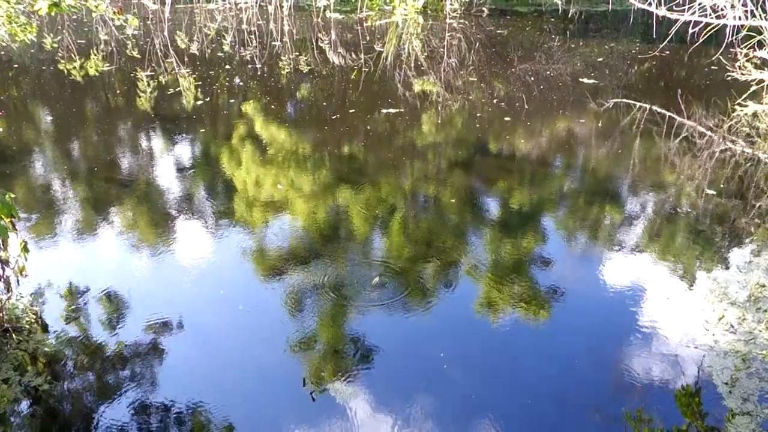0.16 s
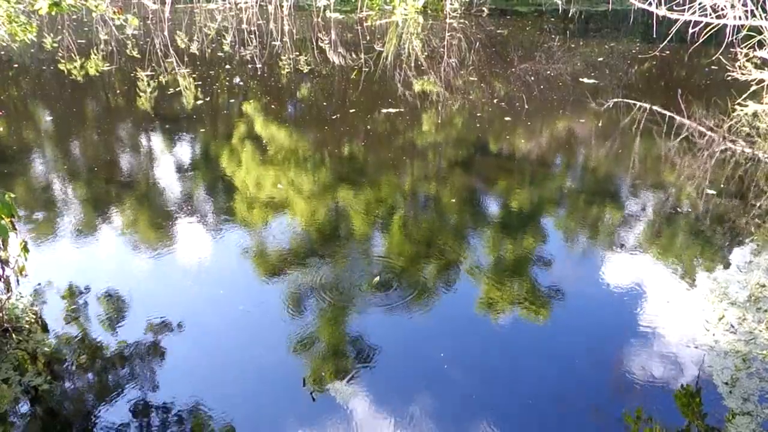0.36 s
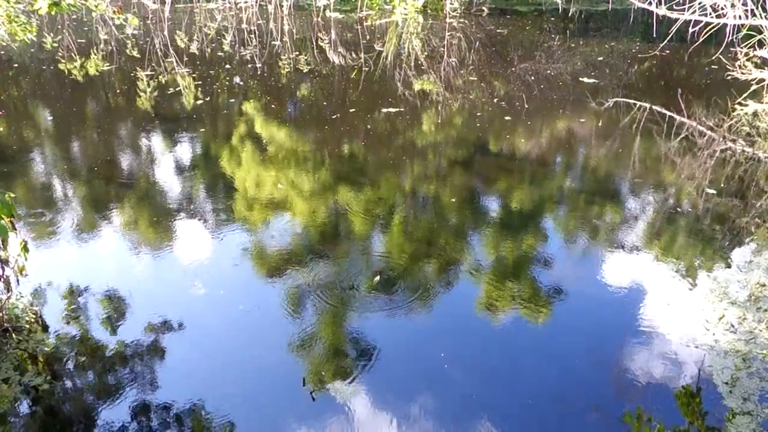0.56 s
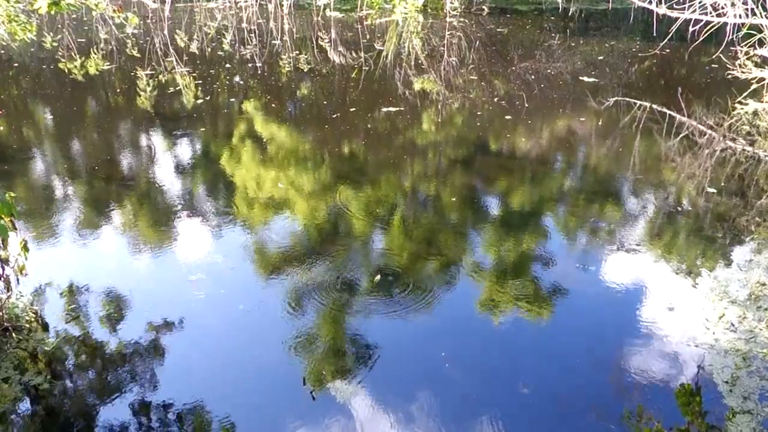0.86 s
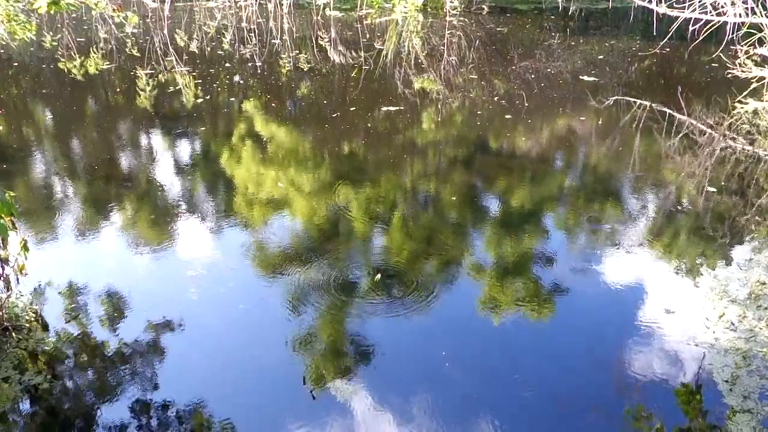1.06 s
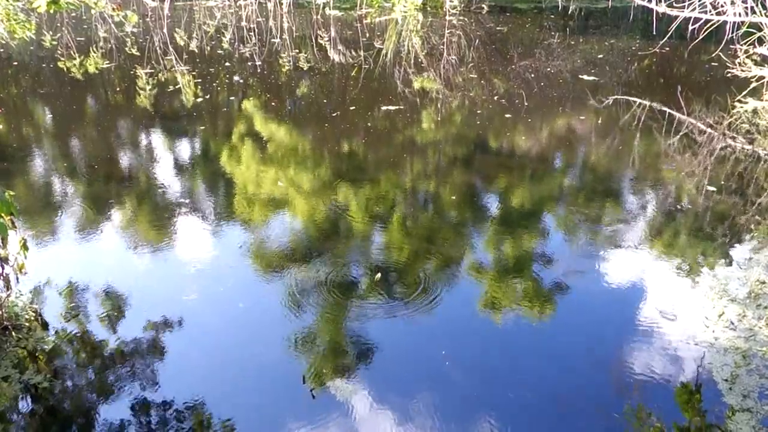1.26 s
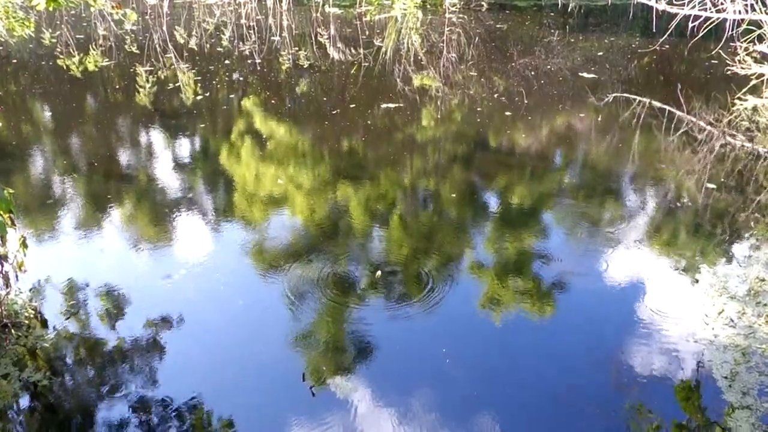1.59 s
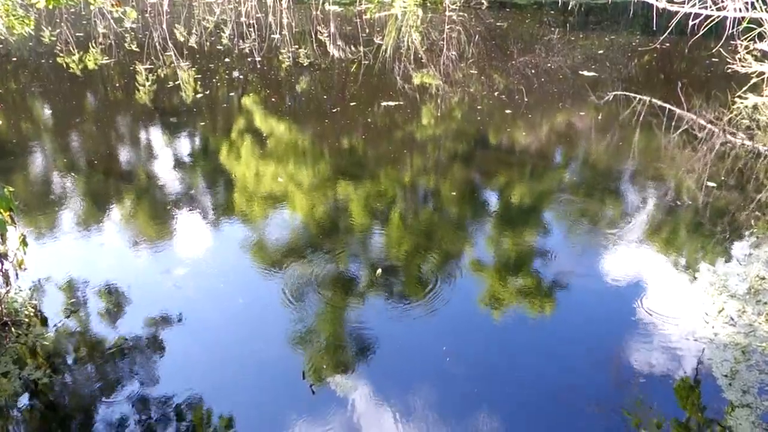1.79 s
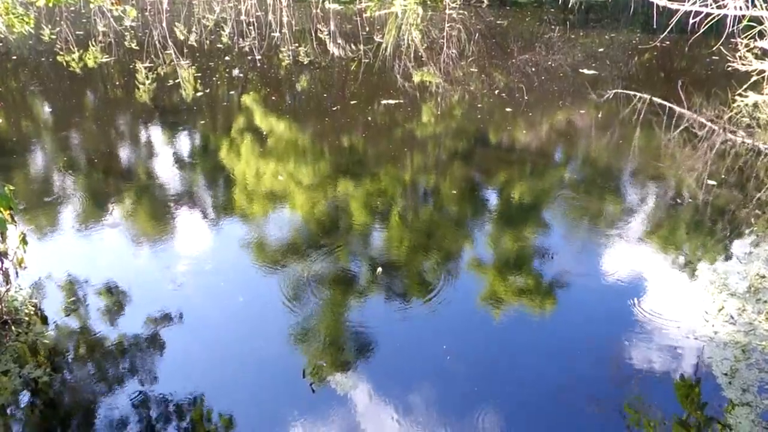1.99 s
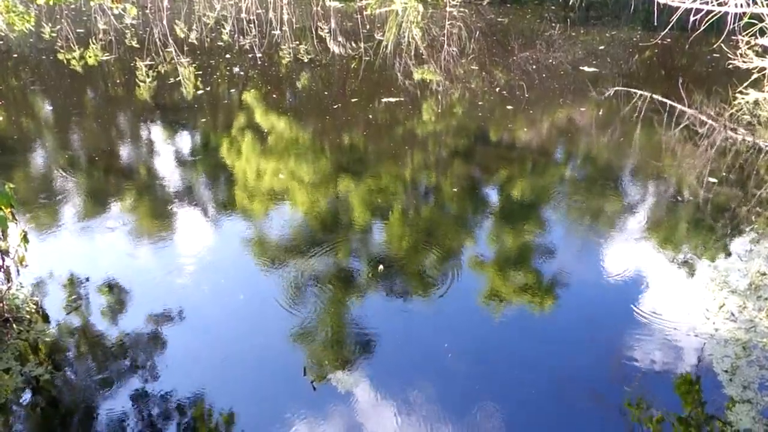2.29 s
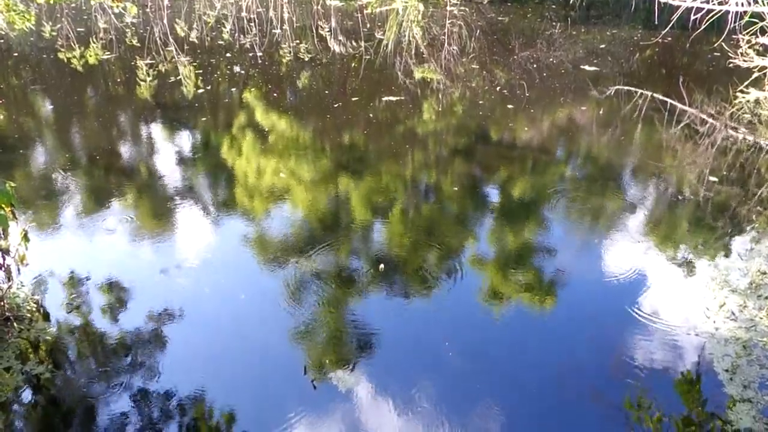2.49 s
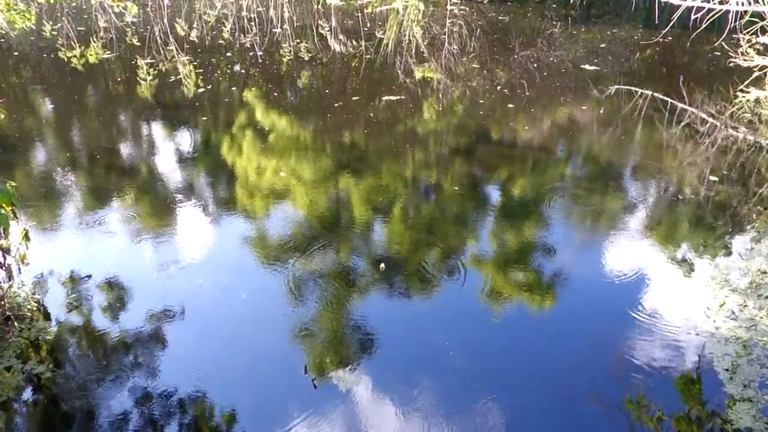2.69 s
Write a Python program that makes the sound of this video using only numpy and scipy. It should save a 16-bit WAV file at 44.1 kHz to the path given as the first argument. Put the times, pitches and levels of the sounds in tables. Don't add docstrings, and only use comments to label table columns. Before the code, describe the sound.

Low bullfrog croaks come in three overlapping groups, two close pitches beating together, with fainter frogs answering. Birds whistle and chirp on both sides over a swelling insect hiss; outdoor stereo with a short pond echo.

```python
import sys
import numpy as np
from scipy import signal
from scipy.fft import rfft, irfft
from scipy.io import wavfile
from scipy.ndimage import uniform_filter1d

SR = 44100
rng = np.random.default_rng(int(sys.argv[2]) if len(sys.argv) > 2 else 0)


def invert_db(level):
    return 10 ** (np.asarray(level, dtype=float) / 20)


def to_wav(s):
    ch = np.atleast_2d(s).T
    pcm = np.round(np.clip(ch, -1, 1) * 32767)
    wavfile.write(sys.argv[1], SR, pcm.astype(np.int16))


N = 125685
T = np.arange(N) / SR


def evened(x):
    return x / np.sqrt(np.mean(x ** 2) + 1e-20)


def read(points, hz):
    f, value = np.transpose(points)
    return np.interp(np.log(hz + 1), np.log(f + 1), value)


def drift(shape, size):
    once = uniform_filter1d(rng.standard_normal(shape), size)
    return evened(uniform_filter1d(once, size))


def add(mix, s, sound):
    i = round(s * SR)
    part = mix[max(i, 0):max(i + len(sound), 0)]
    part += sound[max(-i, 0):][:len(part)]


def follow(curve):
    s, hz, db = np.transpose(curve)
    t = np.arange(s[0], s[-1], 1 / SR)
    ends = np.clip(np.minimum(t - s[0], s[-1] - t) / 0.0018, 0, 1)
    pitch = uniform_filter1d(np.interp(t, s, hz), size=200)
    level = uniform_filter1d(np.interp(t, s, db), size=200)
    return pitch, ends * invert_db(level)


def tail(x, t60):
    t = np.arange(SR // 2) / SR
    taps = rng.standard_normal((2, len(t))) * (rng.random((2, len(t))) < .05)
    taps = taps * invert_db(-60 * t / t60) * (t > .006)
    taps = taps / np.linalg.norm(taps, axis=1)[:, None]
    return signal.fftconvolve(x[None], taps, axes=1)[:, :N]


def hiss(spectrum, patchy_db, lag_s):
    # f/Hz, likeness [0-1]
    coherence = [(60, 1), (300, 0.92), (1500, 0.19), (3000, 0.93), (6800, 0.24), (15000, 0.13)]
    frames, hz = N // 512 + 6, np.fft.rfftfreq(2048, 1 / SR)
    a, b, c, d, patches = rng.standard_normal((frames, 1025, 5)).T
    patches = uniform_filter1d(patches, size=12, axis=0)
    patches = evened(uniform_filter1d(patches, size=8, axis=1))
    same = np.clip(read(coherence, hz), -1, 1)[:, None]
    left, other = a + 1j * b, c + 1j * d
    delay = np.exp(2j * np.pi * hz * lag_s)[:, None]
    right = same * left * delay + np.sqrt(1 - same ** 2) * other
    z = np.array([left, right]) * invert_db(read(spectrum, hz)[:, None] + patchy_db * patches)
    return evened(signal.istft(z, nperseg=2048, noverlap=1536)[1][:, :N])


def outdoor_rumble():
    # f/Hz, level/dB per Hz
    low_spectrum = [(20, -28), (100, -4), (200, -8), (400, -8.5), (700, -28), (2400, -20)]
    return invert_db(-52.5) * hiss(low_spectrum + [(3000, -69)], patchy_db=1.74, lag_s=0)


def insect_chorus():
    # t/s, level/dB
    swell = [(0, -2.5), (.6, -1.5), (1.0, 0), (2.0, 1.5), (2.85, 3.5)]
    # f/Hz, level/dB per Hz
    chorus_spectrum = [(2300, -12.5), (2700, -2.5), (4100, 1), (5200, -1), (6700, 3.5), (7500, -3),
                       (8300, -13.5), (10000, -17)]
    level = invert_db(-42.5 + np.interp(T, *np.transpose(swell)))
    return level * hiss([(1900, -32)] + chorus_spectrum + [(13000, -35)], patchy_db=2.0, lag_s=5e-5)


def insect_air():
    # f/Hz, level/dB per Hz
    air_spectrum = [(9000, -11), (13000, -1), (15900, -9.5)]
    return invert_db(-55.5) * hiss([(7000, -36)] + air_spectrum, patchy_db=-3.0, lag_s=5e-5)


def katydid():
    # t/s, level/dB
    buzz = [(0, -58.5), (.35, -53), (.69, -54), (.72, -67), (2.0, -69), (2.5, -54), (2.85, -54)]
    centre_hz, width_hz = 12770, 1730
    strokes_per_s, first_stroke_s = 55.3, .3815
    band = signal.butter(2, [centre_hz - width_hz / 2, centre_hz + width_hz / 2], "band", fs=SR)
    a, b = evened(signal.lfilter(*band, rng.standard_normal((2, N))))
    sharpness = np.where(T < 1, .7, .25)
    phase = 2 * np.pi * strokes_per_s * (T - first_stroke_s)
    strokes = evened(np.exp(sharpness * np.cos(phase)))
    scraping = np.array([a, 0.6 * a + 0.94 * b])
    return invert_db(np.interp(T, *np.transpose(buzz))) * strokes * scraping


def note(curve, tones_db):
    flutter_db = 2.5
    hz, gain = follow(curve)
    turns = np.cumsum(hz * (1 + .002 * drift(len(hz), 60))) / SR
    k = np.arange(1, len(tones_db) + 1)[:, None]
    db = np.array(tones_db)[:, None] + flutter_db * drift((len(k), len(hz)), 220)
    partials = invert_db(db) * np.sin(2 * np.pi * k * turns)
    return np.sqrt(2) * gain * partials.sum(0)


def whistle(s, length, db, a, b):
    return note([(s, a, db - 6),
                 (s + .25 * length, .8 * a + .2 * b, db),
                 (s + .7 * length, .35 * a + .65 * b, db),
                 (s + length, b, db - 6)], [0])


def bank(x, lag_s, pan_db, trees_db):
    delay = np.exp(-2j * np.pi * np.fft.rfftfreq(N, 1 / SR) * lag_s)
    late = irfft(rfft(x) * delay, N)
    direct = np.array([late * invert_db(pan_db / 2), x * invert_db(-pan_db / 2)])
    direct = direct * invert_db(2 * drift((2, N), 300))
    return direct + invert_db(trees_db) * tail(x, t60=.45)


def left_birds():
    # t/s, length/s, level/dB, from f/Hz, to f/Hz
    phrase = [(0.124, 0.024, -46.5, 2646, 2850), (0.142, 0.051, -40.5, 2980, 2894),
              (0.191, 0.023, -42.5, 2780, 2660), (0.209, 0.041, -44, 2670, 2480),
              (0.293, 0.018, -42.5, 2800, 2840), (0.314, 0.0114, -39, 2843, 2670),
              (0.324, 0.0297, -45, 2660, 2480), (.404, 0.059, -51, 3213, 3520),
              (.405, .016, -42.5, 2750, 2660), (0.42, 0.026, -45.5, 2656, 2490),
              (.52, 0.016, -44, 2606, 2440), (0.542, 0.025, -49.5, 2513, 2650),
              (0.629, 0.019, -49, 2590, 2460)]
    out = np.zeros(N)
    for row in phrase:
        add(out, row[0], whistle(*row))
    return bank(out, lag_s=-5e-5, pan_db=6, trees_db=-2)


def right_birds():
    # t/s, length/s, level/dB, from f/Hz, to f/Hz
    whistles = [
        (-.01, .03, -47, 5950, 5500),
        (.12, .032, -44, 5950, 5400),
        (.798, .05, -45, 2880, 2960),
        (.848, .035, -46, 5600, 4950),
        (.995, .03, -49, 4100, 3650),
        (2.09, 0.08, -48, 3740, 3830),
        (2.15, .07, -42, 3820, 3870),
        (2.21, 0.1, -46, 3930, 4240),
                (.85, .06, -52, 2960, 2950),
        (1.465, .04, -47, 3450, 2600),
        (1.515, .037, -47, 2850, 3050),
        (1.664, .026, -43, 5800, 4500),
        (1.75, .14, -52, 2520, 2250),
        (1.935, .022, -48, 3400, 3350),
        (1.955, .035, -46, 3350, 2300),
        (2.0, .03, -47, 2680, 2850),
        (2.322, .016, -46, 4600, 4400),
    ]
    # t/s, fundamental f/Hz, level/dB
    arch = [(1.62, 1150, -50), (1.632, 1320, -40), (1.645, 1380, -36), (1.66, 1370, -39),
            (1.672, 1280, -41), (1.685, 1135, -44)]
    # t/s, fundamental f/Hz, level/dB
    risers = [
        [(1.61, 2330, -49), (1.625, 2600, -42), (1.64, 2890, -39), (1.662, 2905, -37), (1.675, 2910, -44),
         (1.69, 2915, -52)],
        [(2.03, 2170, -46), (2.062, 2270, -41), (2.09, 2680, -45), (2.12, 2735, -40), (2.16, 2780, -43),
         (2.2, 2825, -39), (2.26, 2890, -45), (2.34, 2930, -48)],
    ]
    # t/s, fundamental f/Hz, level/dB
    slurs = [
        [(2.195, 2860, -53), (2.245, 2884, -44), (2.262, 2770, -38), (2.28, 2724, -36.5), (2.305, 2684, -34.5),
         (2.328, 2530, -49.5)],
        [(2.443, 2385, -50), (2.465, 2620, -40), (2.5, 2600, -41), (2.535, 2570, -41), (2.56, 2500, -46),
         (2.59, 2220, -56)],
        [(2.68, 3097, -53), (2.7, 2960, -41), (2.722, 2800, -49), (2.74, 2750, -43.5), (2.762, 2772, -38.5),
         (2.785, 2800, -42.5), (2.82, 2760, -40), (2.87, 2606, -46)],
    ]
    # t/s, fundamental f/Hz, level/dB
    nasal = [(2.635, 1370, -58), (2.655, 1500, -50), (2.68, 1530, -46), (2.705, 1545, -47),
             (2.735, 1530, -55)]
    arch_tones = [-30, -14, 0, -9, -11, -18]
    riser_tones = [-15, 0, -15, -30]
    slur_tones = [0, -10, -9, -17]
    nasal_tones = [-27, -8, 0, -1, 0, -8]
    out = np.zeros(N)
    for row in whistles:
        add(out, row[0], whistle(*row))
    for curves, tones in (([arch], arch_tones), (risers, riser_tones),
                          (slurs, slur_tones), ([nasal], nasal_tones)):
        for curve in curves:
            add(out, curve[0][0], note(curve, tones))
    return bank(out, lag_s=6e-5, pan_db=-3, trees_db=-6)


def croak(curve, thin_db):
    # f/Hz, level/dB
    voice = [(115, -29.5), (250, 1), (335, -13), (360, -10.5), (395, -16.5), (480, -25), (1000, -25),
             (2200, -21.5)]
    # f/Hz, width/Hz, level/dB
    mouth = [(710, 20, 7.5), (1367, 88, 8.5), (1750, 41, 6)]
    top_hz, jitter, waver_db, rasp_db = 2900, 0.0062, 3, -1.5
    loud, overtone_share = invert_db(-57.5), 0.82
    hz, gain = follow(curve)
    turns = np.cumsum(hz * (1 + jitter * drift(len(hz), 500))) / SR
    k = np.arange(1, 25)[:, None]
    db = read(voice, k * hz) + thin_db * (k > 2)
    db = db - 150 * np.clip(k * hz / top_hz - .8, 0, 9)
    db = db + sum(peak_db * np.exp(-((k * hz - f) / wide) ** 2) for f, wide, peak_db in mouth)
    db = db + waver_db * np.minimum(k / 4, 1) * drift(db.shape, 500)
    effort = loud * (gain / loud) ** np.where(k > 4, overtone_share, 1)
    rasp = 1 + invert_db(rasp_db) * (k > 3) * drift(db.shape, 100)
    partials = np.cos(2 * np.pi * (k * turns + rng.random(k.shape)))
    return np.sqrt(2) * (effort * invert_db(db) * rasp * partials).sum(0)


def far_frogs():
    # t/s, length/s, level/dB, pulse rate f/Hz
    far_calls = [(-.05, 0.22, -44.5, 109.4), (0.2, 0.15, -43, 119.5), (0.453, 0.24, -58, 112.6),
                 (.62, 0.45, -57.5, 113.8), (0.659, 0.35, -54, 119.7), (0.854, 0.32, -45.5, 110.5),
                 (0.882, 0.25, -53, 119.4), (1.504, 0.3, -64, 121.2), (1.753, 0.22, -60, 107.6),
                 (1.804, 0.31, -50.5, 122.2), (2.453, 0.3, -59.5, 122.1), (2.686, .3, -64.5, 106.6)]
    out = np.zeros(N)
    for s, length, db, hz in far_calls:
        curve = [(s, hz * .98, db - 11.5),
                 (s + 0.344 * length, hz, db),
                 (s + 0.712 * length, hz, db),
                 (s + length, hz * 0.89, db - 10)]
        add(out, s, croak(curve, thin_db=3.5))
    return out


def near_frogs():
    # t/s, pulse rate f/Hz, effort level/dB
    high_calls = [
        [(-.05, 118.2, -72), (.06, 123.5, -36), (.14, 126.9, -38), (.21, 130.8, -34.5), (.27, 127.8, -37),
         (.33, 121.2, -54)],
        [(.97, 121.3, -60), (1.05, 121.7, -37), (1.1, 123.1, -49.5), (1.15, 126.3, -41), (1.22, 129.8, -33.5),
         (1.3, 131, -35), (1.36, 132.7, -46.5), (1.42, 133.6, -46.5), (1.52, 128, -62)],
        [(2.1, 120.5, -48), (2.15, 121.4, -40.5), (2.2, 125.4, -43), (2.25, 127.1, -44), (2.3, 129.5, -33),
         (2.4, 134.4, -33.5), (2.45, 131.4, -37), (2.5, 129.2, -48), (2.64, 131.3, -54)],
    ]
    # t/s, pulse rate f/Hz, effort level/dB
    low_calls = [
        [(.1, 111.8, -49), (.16, 111.7, -35.5), (.21, 115.5, -33), (.3, 112.2, -33.5), (.4, 113.9, -35),
         (.45, 112.7, -43), (.56, 110, -58.5)],
        [(1.08, 116, -46.5), (1.15, 116.5, -36), (1.2, 115.4, -39), (1.25, 116.2, -36.5), (1.31, 120.6, -37),
         (1.35, 122.7, -34), (1.4, 117.2, -38), (1.45, 114.6, -46.5), (1.53, 115.8, -54.5)],
        [(1.9, 111.7, -48.5), (2.0, 118.6, -47), (2.06, 113.9, -42), (2.15, 114.2, -38), (2.22, 115.5, -35.5),
         (2.3, 121, -36), (2.4, 122.8, -36), (2.45, 114.9, -40.5), (2.56, 115.2, -64)],
    ]
    out = np.zeros(N)
    for calls, thin_db in ((high_calls, -1), (low_calls, 0)):
        for curve in calls:
            add(out, curve[0][0], croak(curve, thin_db))
    return out


def frogs():
    notch_hz, notch_wide_hz, notch_db = 862, 70.4, -18.5
    calls = near_frogs() + far_frogs()
    wet = tail(calls, t60=0.96)
    bass = signal.butter(2, 600, fs=SR)
    wet = wet + signal.filtfilt(*bass, wet.mean(0) - wet)
    hz = np.fft.rfftfreq(N, 1 / SR)
    dip = invert_db(notch_db * np.exp(-((hz - notch_hz) / notch_wide_hz) ** 2))
    return irfft(rfft(calls + invert_db(-7) * wet) * dip, N)


def scene():
    background = outdoor_rumble() + insect_chorus() + insect_air()
    return background + katydid() + left_birds() + right_birds() + frogs()


def roll_off(x):
    return signal.sosfilt(signal.butter(12, 16130, fs=SR, output="sos"), x)


def record(dry):
    return roll_off(dry)


dry = scene()
out = record(dry)
to_wav(out)
```